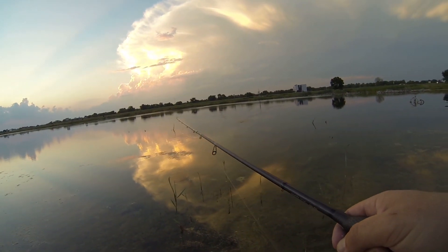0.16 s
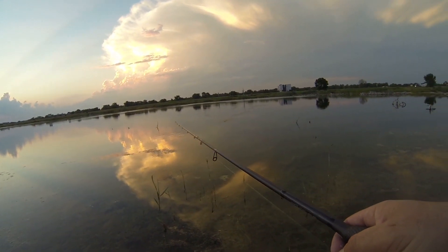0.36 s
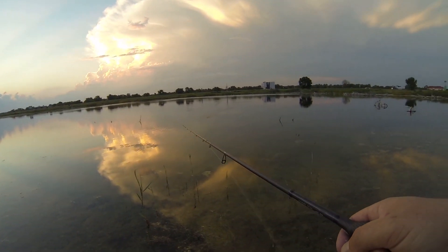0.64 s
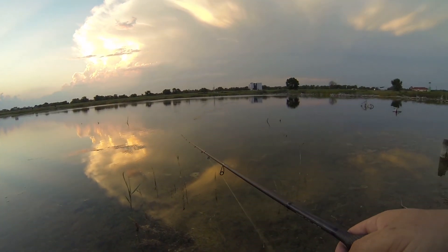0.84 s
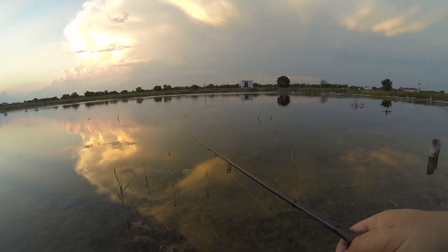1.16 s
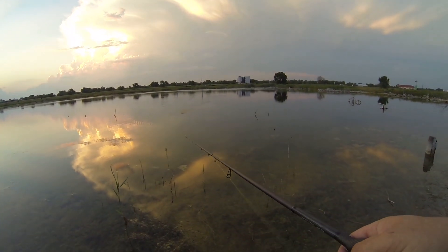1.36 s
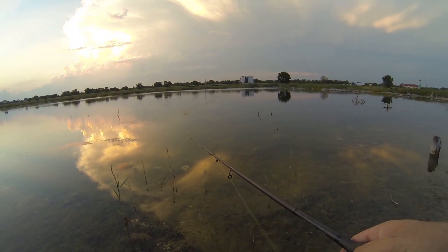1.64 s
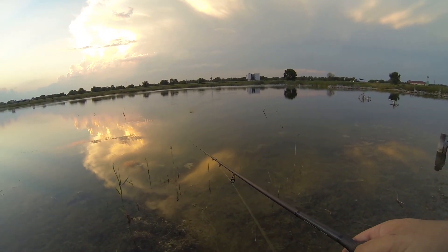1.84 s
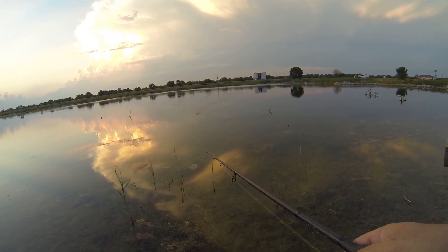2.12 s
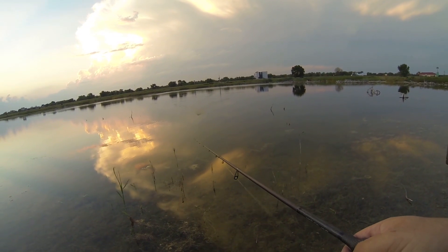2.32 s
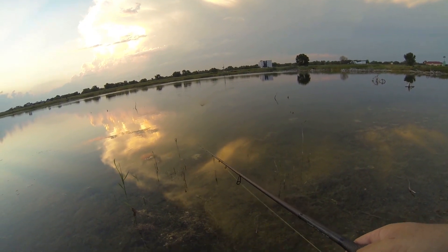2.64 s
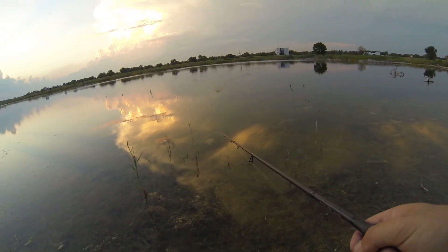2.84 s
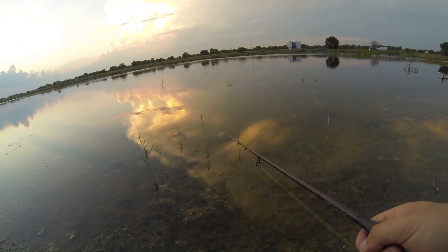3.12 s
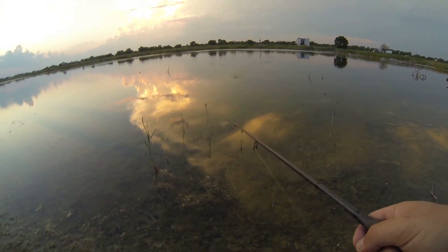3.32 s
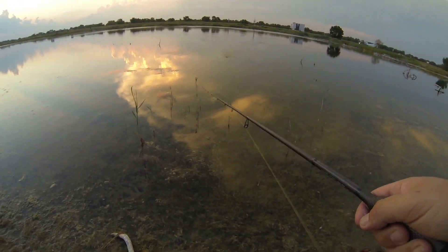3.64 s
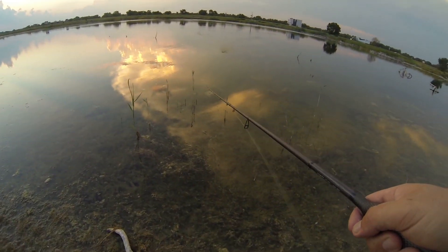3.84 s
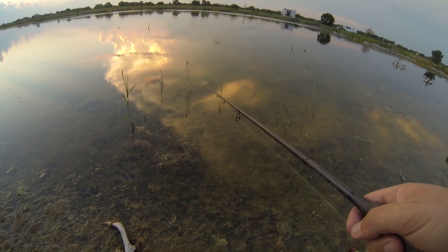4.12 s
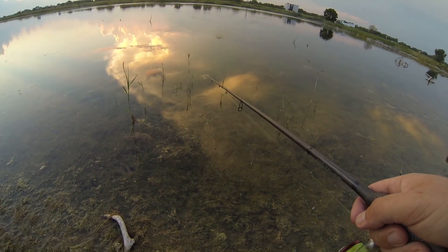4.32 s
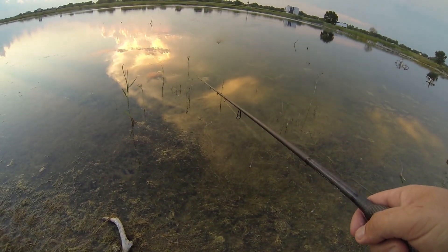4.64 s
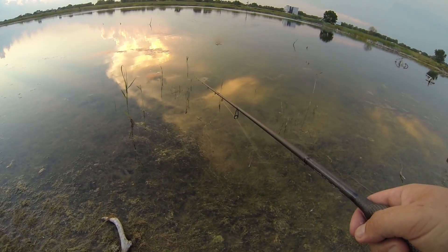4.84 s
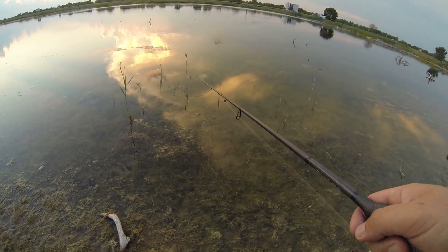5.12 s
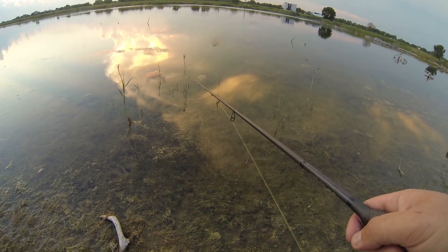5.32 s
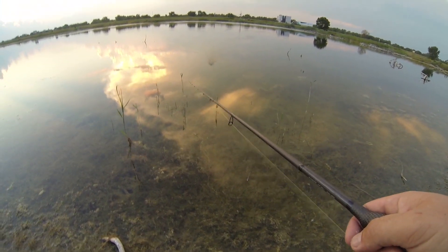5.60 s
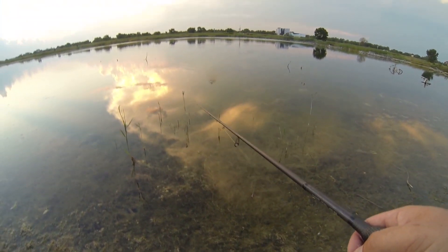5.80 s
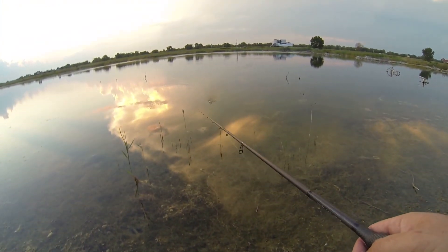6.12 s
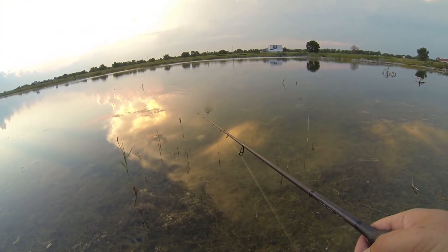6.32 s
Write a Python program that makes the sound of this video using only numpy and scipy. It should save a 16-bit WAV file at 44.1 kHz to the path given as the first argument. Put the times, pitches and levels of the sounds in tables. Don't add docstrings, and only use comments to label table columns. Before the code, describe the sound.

Steady low rumble of distant highway traffic over a still pond, with faint cricket chirps, small water plops and light tackle clicks.

```python
import sys
import numpy as np
from scipy import signal
from scipy.fft import rfft, irfft, next_fast_len
from scipy.io import wavfile
from scipy.ndimage import uniform_filter1d

SR = 44100
rng = np.random.default_rng(int(sys.argv[2]) if len(sys.argv) > 2 else 0)


def output_pcm(signal):
    pcm = np.clip(np.atleast_2d(signal).T, -1, 1) * 32767
    wavfile.write(sys.argv[1], SR, np.round(pcm).astype(np.int16))


def magnitude_from_level(level_db):
    exponent = np.asarray(level_db, float) / 20
    return 10 ** exponent


N = 284886
T = np.arange(N) / SR

# time_s, half_length_s, wash_swell_db
WADING = [
    (0.139, .1, 3),
    (0.696, 0.34, 1.5),
    (2.67, 0.086, 5),
    (3.45, 0.14, 3.5),
    (5.72, .08, 0.5),
    (6.12, 0.044, 1),
    (6.4, 0.2, 3),
]


def at_rms(x, db):
    return x * magnitude_from_level(db) / np.sqrt(np.mean(x ** 2))


def walk(rate):
    hold = int(SR / rate / 16)
    coarse = np.repeat(rng.standard_normal(N // 16 // hold + 1), hold)
    slewed = uniform_filter1d(uniform_filter1d(coarse, hold), hold)
    return np.repeat(1.3 * slewed, 16)[:N]


def roar(shape, patchy_db, rate):
    size = next_fast_len(N)
    octave = np.log2(np.arange(1, size // 2 + 2) * SR / size)
    hz, db = np.transpose(shape)
    gain = magnitude_from_level(np.interp(octave, np.log2(hz), db, left=-120, right=-120))
    colour = gain * rfft(rng.standard_normal(size))
    out = 0
    for mid in np.arange(np.log2(hz[0]), np.log2(hz[db > -60][-1]) + .5, .5):
        part = colour * np.clip(1 - 2 * abs(octave - mid), 0, 1)
        out = out + irfft(part, size)[:N] * magnitude_from_level(patchy_db * walk(rate))
    return at_rms(out, 0)


def add_tone(out, s, db, hz, length, ratio=1., bend=1., sharp=1., flat=1., octave_db=-99):
    count = max(int(length * SR), 4)
    u = np.arange(count) / count
    pitch = hz * (1 + (ratio - 1) * u ** bend)
    phase = 2 * np.pi * (np.cumsum(pitch) / SR + 997 * s)
    arch = np.sin(np.pi * u ** sharp) ** flat
    tone = magnitude_from_level(db) * arch * (np.sin(phase) + magnitude_from_level(octave_db) * np.sin(2 * phase))
    i = int(s * SR)
    out[i:i + count] += tone[:max(N - i, 0)]


def camera():
    # freq_hz, level_db (per Hz)
    hiss_colour = [(3400, -10.5), (5800, 0.5), (6250, -6.5), (7700, -4.5), (9400, -8.5), (10100, -4),
                   (10600, -2.5), (12000, -7.5), (13200, -15), (15000, -18), (15300, -40)]
    # pitch_hz, rms_db
    clock_tones = [(6594, -96), (9830, -98), (9890, -98), (10430, -92), (10848, -99), (12108, -102),
                   (12168, -100), (12228, -102), (12647.4, -95), (12707.3, -99), (13127.1, -100)]
    frame_hz, lamp_hz = 60 / 1.001, 3.996
    phase = T * frame_hz % 1

    def bump(mid, width):
        return np.exp(-((phase - mid) / width) ** 4)

    busy = np.interp(T, [2.6, 4.2, 5.4, 6.2], [0.28, 0.96, 1, 0.42])
    hiss = at_rms(roar(hiss_colour, patchy_db=.4, rate=30), -72.5) * (1 - 0.28 * bump(.47, 0.075))

    sensor = roar([(9800, -20), (10050, 4), (10400, 7), (10650, -11)], patchy_db=-1.0, rate=8)
    flare = busy * bump(.23, 0.13) + 0.6 * bump(.68, .09) + (1 - busy) * bump(1.0, .1)
    hiss = hiss + magnitude_from_level(-74.0) * sensor * flare

    readout = roar([(10500, -13), (11000, 0), (12000, -3), (13300, -12)], patchy_db=0.0, rate=8)
    hiss = hiss + magnitude_from_level(-71.5) * readout * busy * bump(.63, .035)

    for hz, rms_db in clock_tones:
        hiss = hiss + magnitude_from_level(rms_db + 1.5) * np.sin(2 * np.pi * hz * T)
    for s in np.arange(.093, N / SR, 1 / lamp_hz):
        sag = np.interp(s, [3.4, 4.1, 5.4, 5.6], [0, 1, 1, 0])
        add_tone(hiss, s, -70.5, 11200 + 350 * sag, .015, ratio=.99 - .07 * sag)
    add_tone(hiss, 1.572, -69, 10840, .082, ratio=1.008)
    return hiss


def highway():
    # time_s, lorries_db, cars_db
    traffic = [(0, 3, -0.5), (.3, 2, 1.5), (.9, 1, 0.5), (1.5, 1.5, 1), (2.3, -1, 1.5), (2.9, -0.5, 0),
               (3.35, 1.5, -0.5), (3.8, 2.5, -1.5), (4.3, 1, -2.5), (4.7, -1, -3.5), (5.05, 1, -4),
               (5.4, -1, -1.5), (5.75, 0, -1), (6.1, 0.5, -1), (6.46, 0, 0)]
    # freq_hz, level_db (per Hz)
    rumble = [(7.1, -43), (12, -6.5), (43, 1), (76, 0), (92, -6.5), (124, -9.5), (320, -23), (420, -43),
              (700, -120)]
    tyre_roar = [(130, -33), (220, -4.5), (313, -8), (384, -1), (434, -3), (669, -1.5), (767, 0),
                 (1050, -3), (1360, -41), (2310, -120)]
    slow_lorry = [(150, -20), (200, 2), (340, 0.5), (480, -4), (600, -7.5), (760, -20)]
    tread_hiss = [(900, -13), (1030, -2), (1180, 0), (1380, -11), (1550, -26)]
    treble = [(820, -24), (1400, -1), (1800, 1.5), (2210, -9.5), (2500, -10.5), (3250, -37), (5500, -120)]
    water_wash = [(1180, -31), (2000, -1.5), (2370, -9), (2930, -3), (3120, -5.5), (4040, -13),
                  (4510, -18.5), (4800, -19), (5220, -20), (6080, -27.5), (7000, -29.5), (9100, -58),
                  (15400, -120)]
    s, lorries, cars = np.transpose(traffic)
    lorries, cars = np.interp(T, s, lorries), np.interp(T, s, cars)
    wading = sum(db * np.exp(-((T - at) / half) ** 2) for at, half, db in WADING)
    approach = np.clip((T - 4.7) / 1.26, 0, 1)
    return (roar(rumble, patchy_db=0.43, rate=4) * magnitude_from_level(-33.5 + 0.42 * lorries)
            + roar(tyre_roar, patchy_db=0.97, rate=9) * magnitude_from_level(-43 + lorries)
            + roar(slow_lorry, patchy_db=0.5, rate=8) * magnitude_from_level(-45.5) * approach
            + roar(tread_hiss, patchy_db=1.5, rate=12) * magnitude_from_level(-50 + 1.9 * cars)
            + roar(treble, patchy_db=0.74, rate=25) * magnitude_from_level(-52 + .3 * lorries + 0.29 * cars + 0.7 * wading)
            + roar(water_wash, patchy_db=1.5, rate=30) * magnitude_from_level(-60 + 0.27 * lorries + 0.12 * cars + wading))


def vehicle_tones():
    # start_s, end_s, start_hz, end_hz, level_db
    engines = [
        (-1.07, 7.5, 87, 82, -40),
        (-1, 5, 69, 53, -44),
        (-1.1, 4.4, 37, 38, -47.5),
        (2.02, 7.04, 109, 106, -49.5),
        (-1.1, 3.61, 168, 165, -54),
        (-0.3, 4.88, 148, 144, -52.5),
    ]
    # start_s, end_s, start_hz, end_hz, level_db
    whines = [
        (-0.3, 1.8, 778, 692, -48),
        (2, 3.42, 392, 388, -52.5),
        (3, 4.5, 390, 384, -48.5),
        (4.4, 8, 392, 372, -51),
        (3, 4.8, 782, 772, -48),
        (3.5, 4.7, 938, 930, -50),
        (4.5, 5.45, 932, 926, -50.5),
        (5.5, 6.25, 1145, 1135, -51),
        (3.2, 4.5, 620, 600, -52),
    ]
    out = 0
    for start, end, hz0, hz1, db in engines + whines:
        is_engine = hz0 < 300
        width_hz = 2.993 if is_engine else 27
        u = np.clip((T - start) / (end - start), 0, 1)
        pitch = hz0 + (hz1 - hz0) * u + .3 * width_hz * walk(width_hz)
        turn = np.exp(2j * np.pi * np.cumsum(pitch) / SR)
        scatter = min(hz0 / 480, .78)
        scattered = (walk(1.7 * width_hz) + 1j * walk(1.7 * width_hz)) / np.sqrt(2)
        path = np.sqrt(1 - scatter ** 2) + scatter * scattered
        arch = np.sin(np.pi * u) ** (.4 if is_engine else .6)
        out = out + arch * magnitude_from_level(db + 3) * (path * turn).imag
    return out


def far_trill():
    strokes = np.sin(np.pi * np.cumsum(81 + 1.02 * walk(2.0)) / SR) ** 2
    wing = roar([(4950, -14), (5120, 4.0), (5250, -1), (5600, -11)], patchy_db=0.5, rate=5)
    return strokes * wing * magnitude_from_level(-73.5)


def frogs():
    # start_s, peak_db
    first_frog = [(.027, -56), (.096, -51), (.312, -51), (.777, -61), (1.017, -61), (1.088, -53),
                  (1.2, -54), (1.303, -48.5), (1.414, -54), (1.613, -57), (1.935, -52), (2.277, -52),
                  (2.562, -51), (2.652, -56), (2.726, -58), (2.936, -57), (3.433, -57), (3.566, -60),
                  (3.821, -56), (4.241, -50), (4.664, -59), (4.746, -56), (5.282, -60), (5.57, -58),
                  (5.797, -58), (5.982, -59), (6.082, -60), (6.266, -53), (6.369, -57)]
    # start_s, peak_db, pitch_hz
    second_frog = [
        (.652, -60, 3260),
        (.718, -58, 3450),
        (1.605, -61, 3250),
    ]
    out = np.zeros(N)
    faint = [(s * N / SR, -61.5) for s in rng.random(15)]
    for s, db in first_frog + faint:
        add_tone(out, s, db - 5, 2960, .03, ratio=.985)
    for s, db, hz in second_frog:
        add_tone(out, s, db, hz, .024, ratio=.99)
    return out


def ground_crickets():
    # time_s, tick_number, pitch_hz, peak_db
    tick_runs = [
        [(.273, 0, 7450, -75), (.614, 5, 7550, -76), (.823, 8, 7550, -79), (1.106, 12, 7520, -81)],
        [(2.086, 0, 7600, -74.5), (2.45, 6, 7640, -74), (2.83, 12, 7720, -72.5), (3.207, 18, 7790, -76),
         (3.646, 25, 7800, -74), (4.155, 33, 7800, -74), (4.417, 37, 7810, -74), (4.804, 43, 7810, -74),
         (5.193, 49, 7820, -76)],
    ]
    # start_s, length_s, pitch_hz, peak_db
    trills = [(.179, 0.083, 7920, -71), (.735, .08, 7920, -74), (1.4, 0.075, 7900, -76),
              (1.99, .075, 7930, -73), (2.66, .09, 7920, -76), (3.245, .08, 7920, -71),
              (3.795, .12, 7880, -69), (4.36, .085, 7900, -72), (4.97, 0.099, 7880, -74),
              (5.54, .085, 7900, -70), (6.135, .08, 7900, -73), (.2, .085, 8720, -74),
              (3.07, .065, 8720, -75)]
    out = np.zeros(N)
    for run in tick_runs:
        s, number, hz, db = np.transpose(run)
        for k in range(int(number[-1]) + 1):
            when, peak_db, pitch = (np.interp(k, number, marks) for marks in (s, db, hz))
            add_tone(out, when, peak_db + .5, pitch, .018, ratio=.995)
    for s, length, hz, db in trills:
        for dt in np.arange(0, length, 1 / 91):
            swell_db = 4 * np.log(np.sin(np.pi * (dt + .01) / (length + .02)))
            jitter = 0.00032 * rng.standard_normal()
            add_tone(out, s + dt + jitter, db + swell_db, hz, .0085)
    return out


def field_crickets():
    # last_stroke_s, peak_db
    near = [(.353, -52), (.853, -59.5), (1.28, -59), (1.875, -61), (2.516, -56.5), (2.993, -56.5),
            (3.606, -52), (4.181, -55.5), (4.811, -57), (5.364, -53.5), (5.977, -55.5)]
    middle = [(.132, -61.5), (.609, -65), (1.066, -61), (1.522, -63), (1.926, -66.5), (2.319, -63),
              (2.715, -63.5), (3.183, -63), (3.533, -60.5), (3.921, -62.5), (4.353, -61), (4.764, -63),
              (5.193, -64), (5.592, -61), (6.032, -65), (6.456, -69)]
    far = [(.774, -67), (1.309, -66.5), (1.699, -65), (2.185, -69), (2.638, -68), (3.046, -64),
           (3.573, -65), (4.165, -66), (4.633, -63.5), (5.165, -63), (5.868, -67), (6.273, -68)]
    # offset_s (from the last stroke), offset_db (from the chirp peak)
    near_strokes = [
        (-.049, -3),
        (0, 1),
    ]
    other_strokes = [
        (-.094, -3),
        (-.051, 0.5),
        (0, 0.5),
    ]
    # time_s, peak_db
    strays = [(.725, -65), (1.315, -66), (.522, -66), (.812, -66), (2.32, -68), (3.826, -64), (4.063, -66),
              (5.455, -66), (5.54, -62), (6.163, -66)]
    out = np.zeros(N)
    beats = list(strays)
    for chirps, pattern in ((near, near_strokes), (middle + far, other_strokes)):
        beats += [(s + dt, db + offset_db) for s, db in chirps for dt, offset_db in pattern]
    for s, db in beats:
        a, b = rng.standard_normal(2)
        hz = 4590 + 3 * (db + 61) + 18 * a
        length = .0275 + .0002 * (db + 63)
        add_tone(out, s - .003, db - .4, hz, length, ratio=.922 + .007 * b, bend=2.0 + .2 * a,
                 sharp=1.35, flat=.7, octave_db=-25)
    return out


def reed_songs():
    songs = frogs() + ground_crickets() + field_crickets()
    return songs * magnitude_from_level(1.7 * walk(150))


def tackle():
    # time_s, peak_db, pitch_hz
    clicks = [(0.1381, -50, 2540), (0.7836, -42, 2516), (1.0211, -46, 3700), (1.934, -44, 2830),
              (1.9342, -47, 3900), (2.5427, -47, 2320), (2.5762, -46, 2060), (3.2751, -47, 2480),
              (3.309, -42, 2400), (3.4018, -47, 2290), (2.6471, -45.5, 2340), (2.6754, -44, 3140),
              (2.6933, -39, 2500), (2.9297, -44, 3430), (3.4206, -44, 2620), (3.4461, -47, 2870),
              (3.473, -44, 2470), (4.7552, -40, 3000), (5.0767, -40, 2470), (5.5785, -41, 2590),
              (5.5884, -40.5, 2440), (5.8042, -41, 2960), (6.0965, -45, 3140), (6.2292, -42, 2750),
              (6.3779, -39, 2970),
              (1.0211, -60, 5310), (1.3663, -54, 4820), (2.79, -59, 5100), (3.2751, -59, 4700),
                  (3.4225, -54, 3700), (1.8243, -58, 5480), (1.934, -48, 5030), (3.4017, -53, 4700),
                  (3.931, -51, 4950), (4.2524, -56, 5390), (4.3755, -48, 5420), (5.1178, -42.5, 5670),
                  (5.3662, -52, 5350), (5.5438, -54, 4980), (5.8042, -51, 5070), (6.0028, -53, 5060),
                  (6.4143, -43.5, 4740),
              (0.3227, -63, 9430), (0.8155, -66, 10000), (1.2999, -54, 9530), (1.3005, -60, 8200),
                  (1.3334, -62, 9600), (2.9447, -62, 7200), (5.255, -66, 8200), (5.5438, -64, 6800),
                  (2.6784, -66, 8900), (2.7157, -51, 9000), (2.9447, -56, 8480), (3.69, -64, 8910),
                  (3.9809, -65, 9830), (4.0871, -62, 9010), (4.7731, -64, 8900), (5.0114, -65, 8650),
                  (6.3474, -66, 9920)]
    out = np.zeros(N)
    for s, db, hz in clicks:
        add_tone(out, s + .0006, db - 5, 1.15 * hz, 3.5 / hz, ratio=.75, sharp=.7)
        add_tone(out, s + .0006, db - 7, hz, .002 + 7 / hz, ratio=.95, sharp=.4)
    return out


def water():
    # start_s, peak_db, start_hz, rise_ratio, length_s
    plops = [(1.996, -29, 944, 1.1, 0.0061), (2.011, -32.5, 523, 1.05, 0.011),
             (3.76, -42, 1300, 1.06, 0.0087), (3.768, -36, 897, 1.05, .014), (3.79, -35, 850, 1.4, 0.011),
             (3.803, -36, 846, 1.2, 0.02), (3.833, -33, 615, 1.2, 0.0083), (3.5, -36, 870, 0.95, 0.0093),
             (3.853, -31, 650, 1.05, 0.0089), (3.884, -46, 650, 1.2, .01), (3.966, -36, 620, 1.07, 0.014),
             (6.1005, -32.5, 300, 5.6, 0.0165), (4.208, -41, 1400, 1.1, .008),
             (4.99, -40.5, 1260, 1.15, .009), (6.323, -35.5, 520, 2.0, 0.012),
             (6.329, -38, 930, 1.08, 0.014), (6.262, -39, 330, 1.9, 0.011), (5.7, -44, 1800, 1.25, .008),
             (6.19, -36, 280, 1.55, .01)]
    out = np.zeros(N)
    for s, db, hz, ratio, length in plops:
        add_tone(out, s, db, hz, length, ratio=ratio, bend=.7, sharp=.8)
    for when, pitch, size in rng.random((260, 3)):
        hz = 700 * 5.5 ** pitch
        db = -48 - 14 * pitch - 2.2 * np.log(size + .03)
        add_tone(out, when * N / SR, db, hz, 7 / hz, ratio=1.25, sharp=.5)
    for at, half, swell_db in WADING:
        droplets = int(140 * half * swell_db)
        for lag, pitch, size in rng.standard_normal((droplets, 3)):
            hz = 2180 * 1.5 ** abs(pitch)
            db = -51.5 - 6 * abs(pitch) + 4 * size
            add_tone(out, abs(at + .75 * half * lag), db, hz, 3.5 / hz, ratio=1.2, sharp=.5)
    return out


def scene():
    return (camera() + highway() + vehicle_tones() + far_trill() + reed_songs() + tackle() + water())[None]


def roll_off(x):
    return signal.sosfilt(signal.butter(12, 15000, fs=SR, output="sos"), x)


def record(dry):
    from_edge = np.minimum(N - np.arange(N), np.arange(N))
    mix = dry * np.clip(from_edge / 130, 0, 1)
    return roll_off(mix)


dry = scene()
out = record(dry)
output_pcm(out)
```